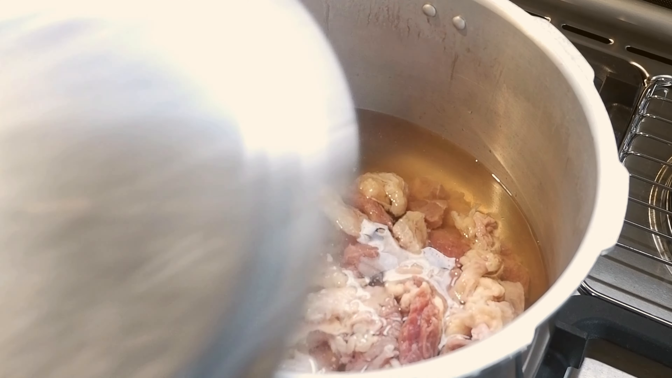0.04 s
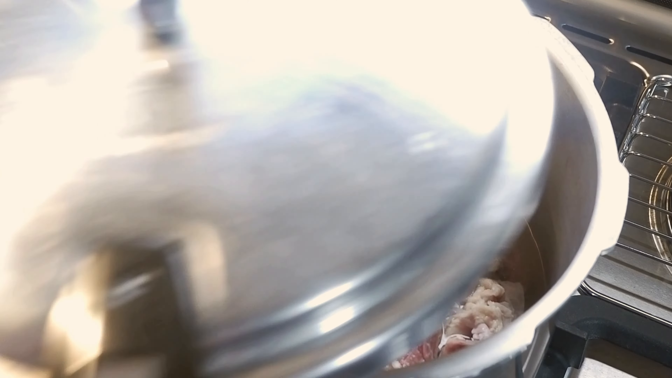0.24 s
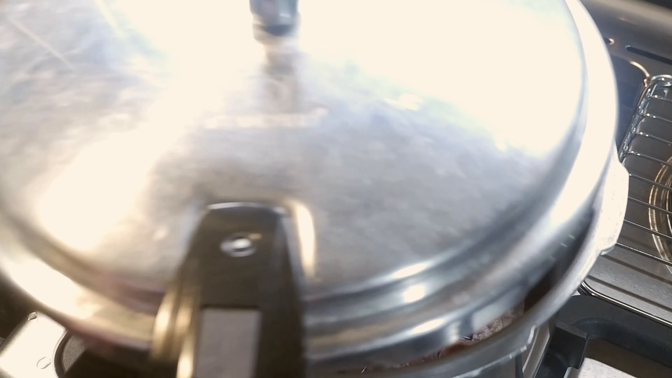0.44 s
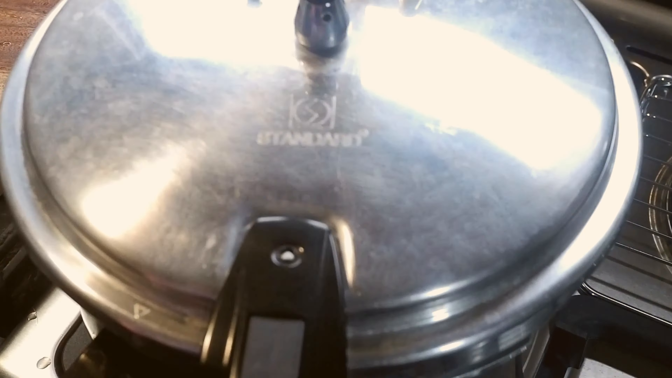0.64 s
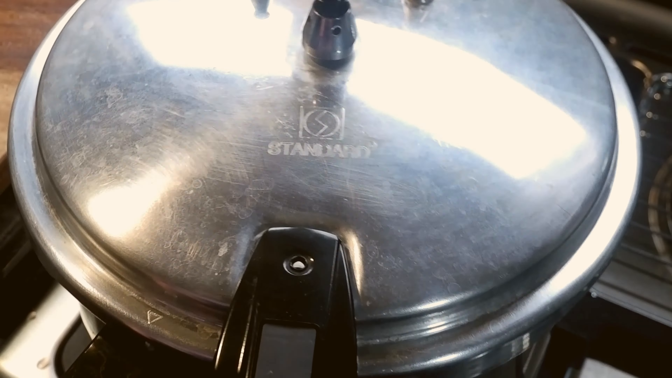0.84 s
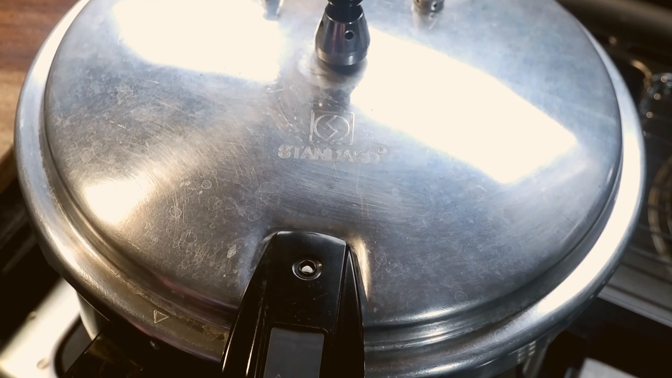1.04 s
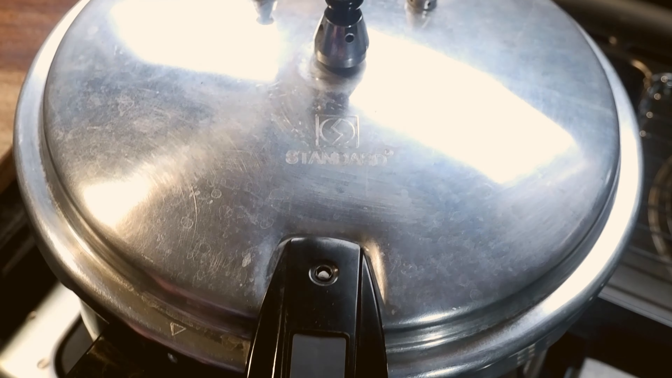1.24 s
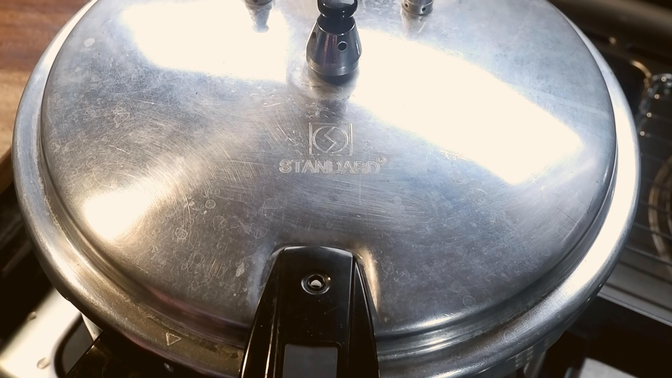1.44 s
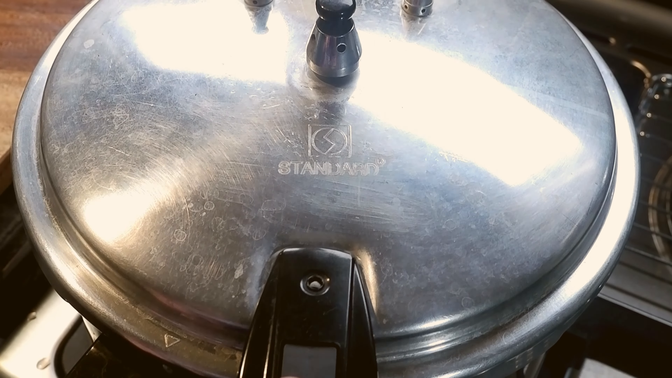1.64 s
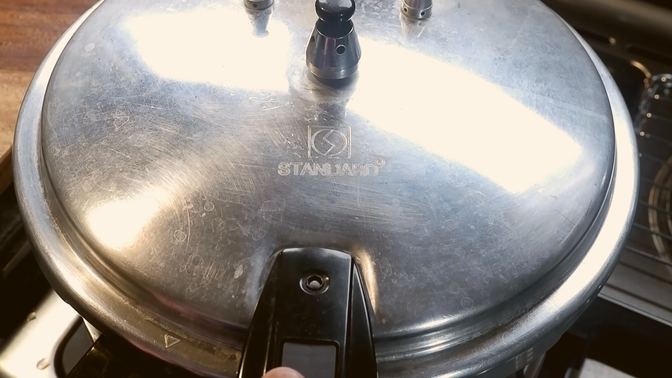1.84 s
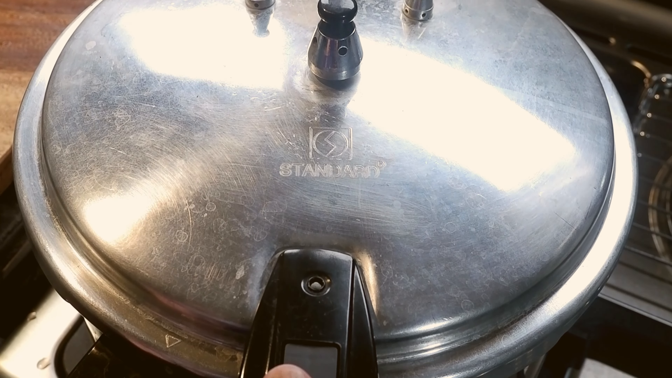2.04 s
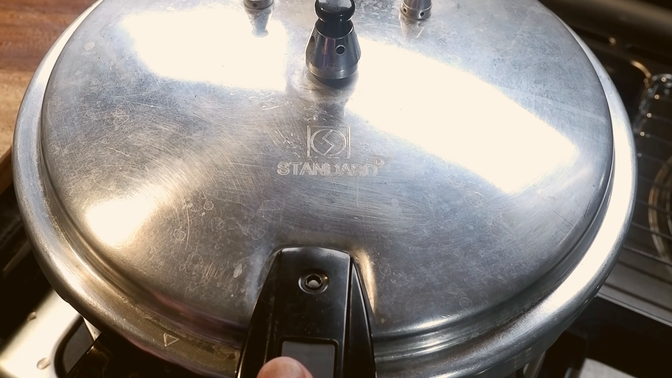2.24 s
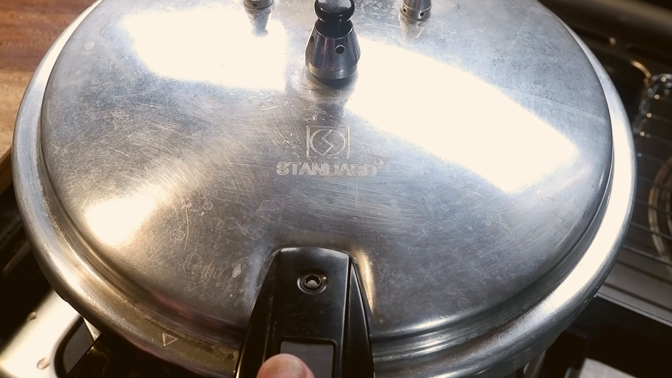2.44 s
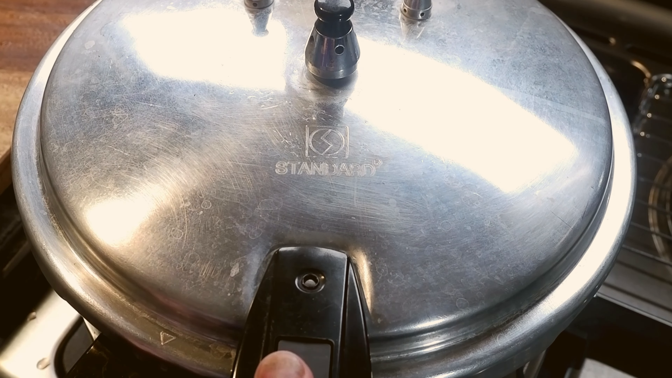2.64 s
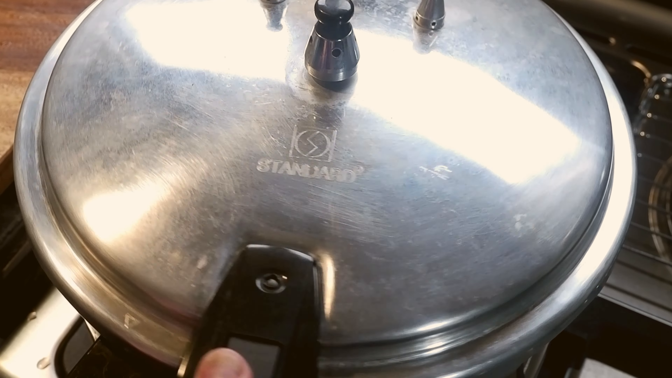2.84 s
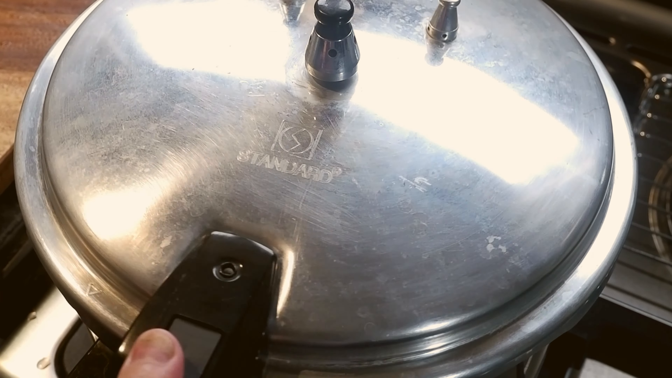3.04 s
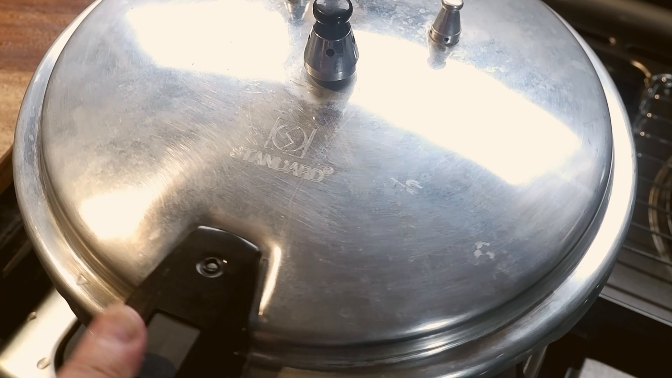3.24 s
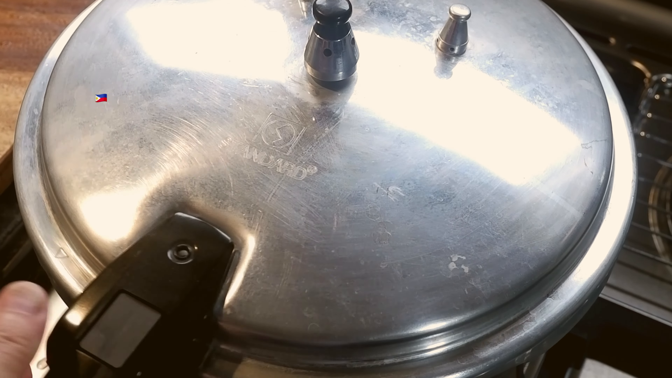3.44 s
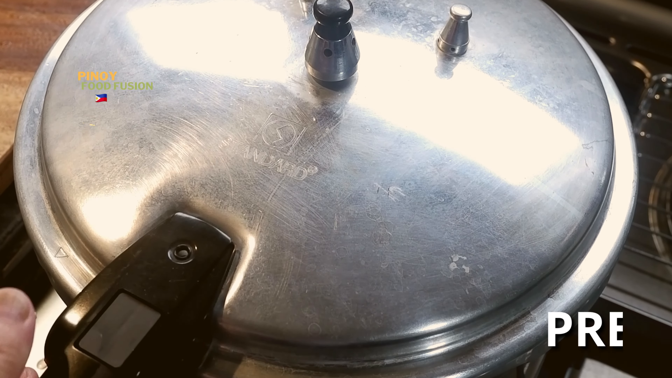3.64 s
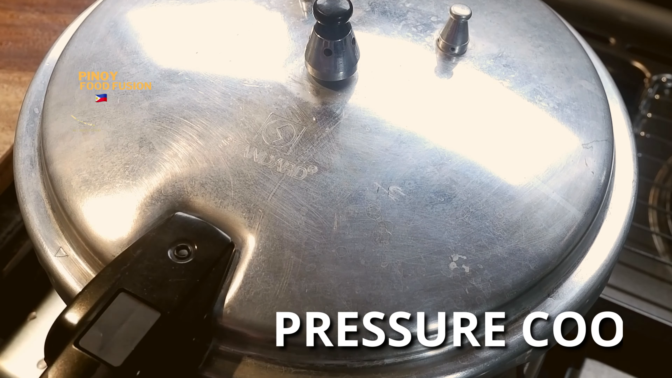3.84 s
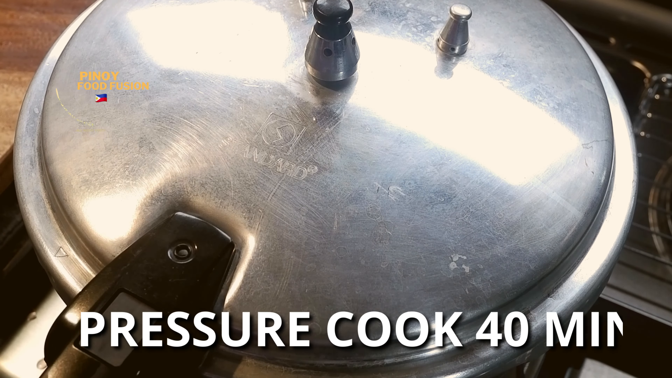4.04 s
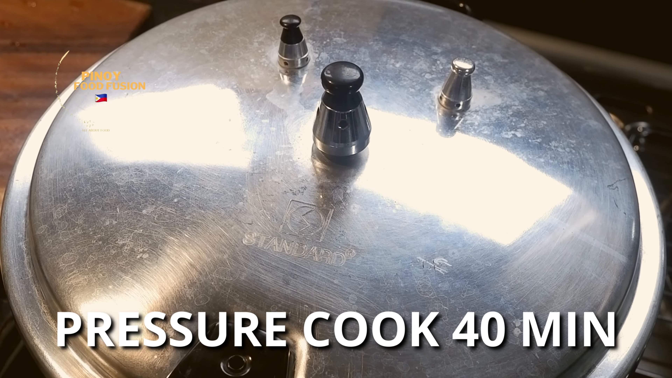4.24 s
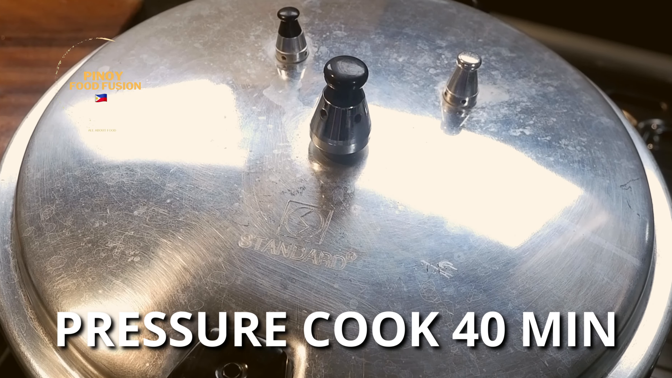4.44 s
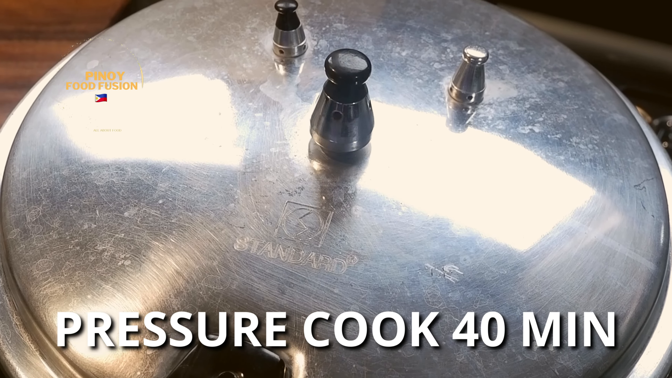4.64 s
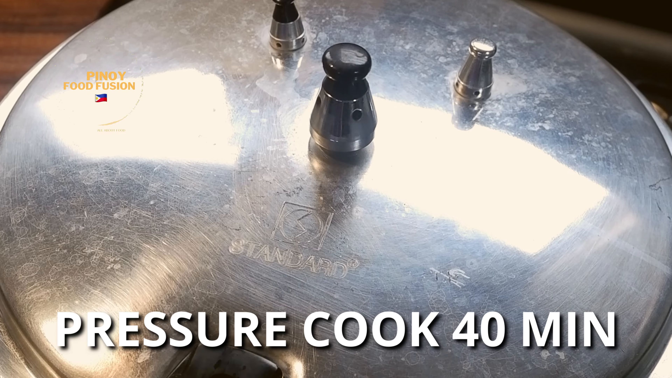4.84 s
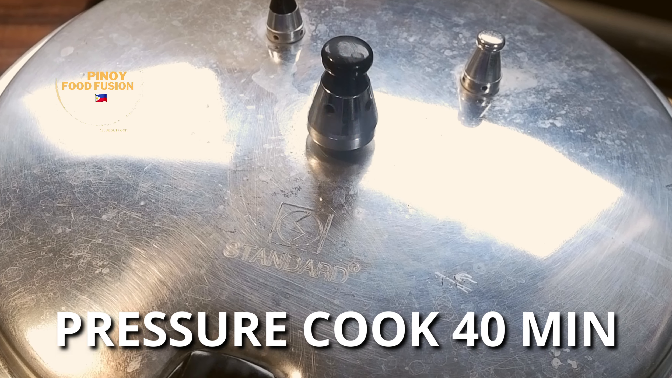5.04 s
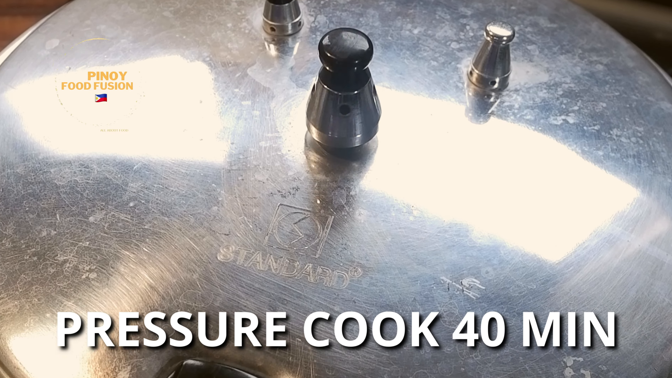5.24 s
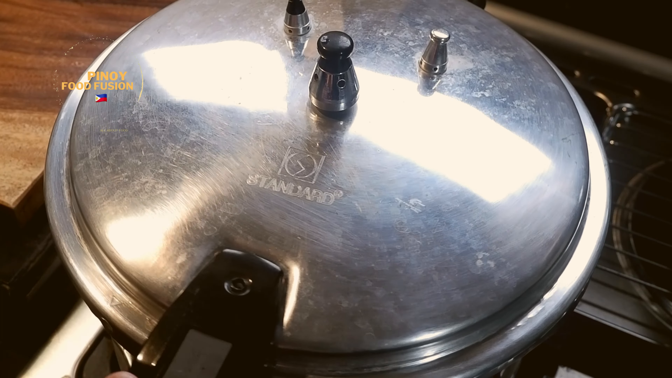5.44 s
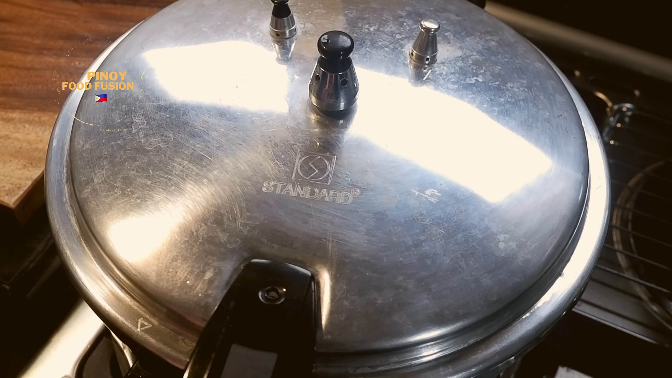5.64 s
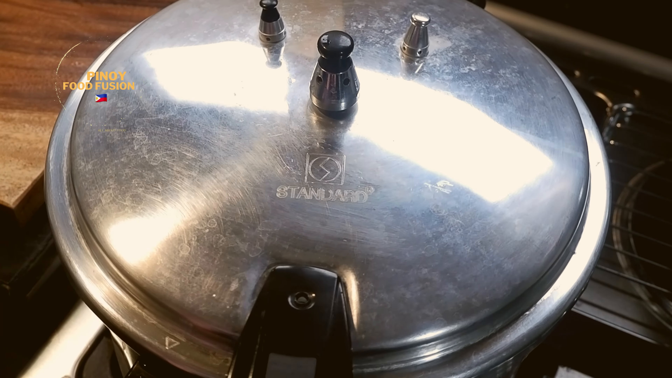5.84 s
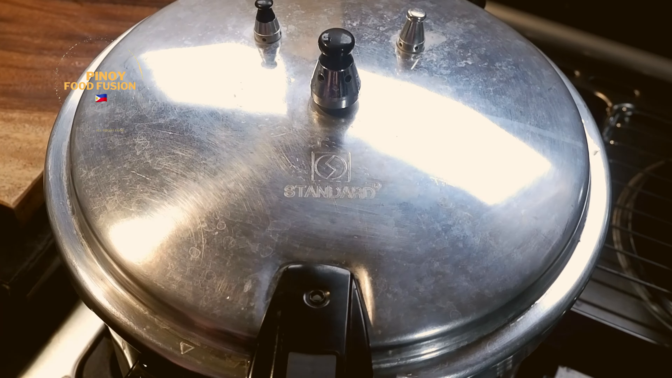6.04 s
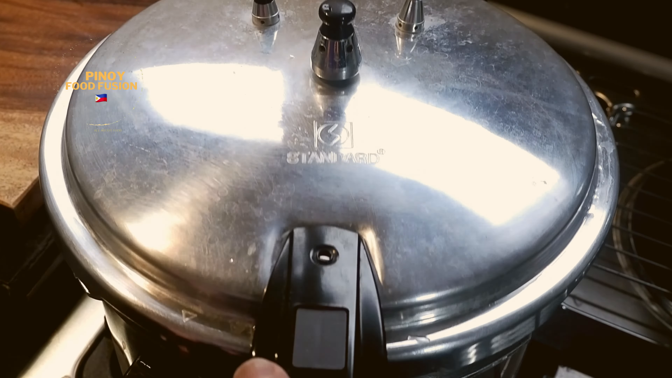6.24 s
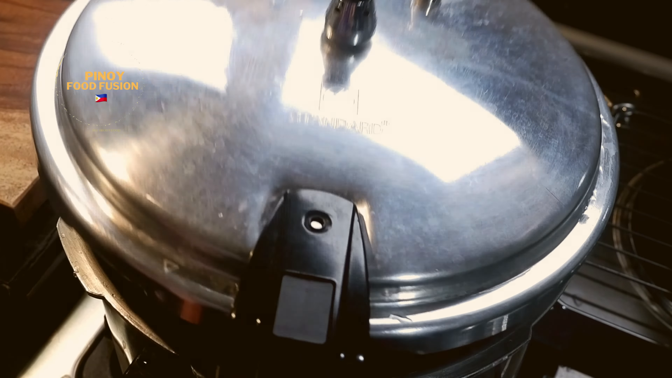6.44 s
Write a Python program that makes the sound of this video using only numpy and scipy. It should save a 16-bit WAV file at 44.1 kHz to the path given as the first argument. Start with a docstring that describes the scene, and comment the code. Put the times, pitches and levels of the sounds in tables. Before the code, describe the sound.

Close stereo pickup of a pressure cooker being shut, with a short room tail. A light clink, then a cluster of solid metallic clanks and round booms, lighter taps and grainy rubbing over a soft handling rush and faint motor-like hum. The lock pin grates and clicks home, leaving near quiet. A bright breathy steam jet cuts in, gurgles and cuts off; then small bumps, a quick squeal and a sharp snap.

```python
"""A steel lid knocks on the rim of a pressure cooker in a small kitchen, bumps, rubs and is twisted shut.
A soft rush of handling (noise) swells; a low hum (harmonics) climbs; the lock scrapes (ringing clicks)
and snaps home; rush and hum sink. Steam (coloured noise) then hisses, sputters and gurgles for a second.
The rush returns, the lock scrapes, squeals and snaps again, and the rush sinks once more.
Knocks sum filtered cracks, grating noise and decaying shell modes; a short room tail follows them."""
import sys
import numpy as np
from scipy import signal
from scipy.fft import rfft, irfft, next_fast_len
from scipy.io import wavfile
from scipy.ndimage import uniform_filter1d

SR = 44100
rng = np.random.default_rng(int(sys.argv[2]) if len(sys.argv) > 2 else 0)


def dump_mix(stems):
    """Bounce the given channels to the path in sys.argv[1] as a 16-bit WAV at rate SR."""
    frames = np.atleast_2d(stems).T  # one column per channel
    limited = np.clip(frames, -1, 1)  # hard clip at full scale
    pcm = np.round(limited * 32767).astype(np.int16)
    wavfile.write(sys.argv[1], SR, pcm)


N = 286694
T = np.arange(N) / SR


def undb(db):
    """Decibels to gain."""
    return 10 ** (np.asarray(db) / 20)


def unit(x):
    """Scale to rms 1."""
    return x / np.sqrt(np.mean(x ** 2))


def fade(t, t60):
    """Exponential decay, 60 dB in t60 seconds."""
    return np.exp(-np.log(1000) * t / t60)


def swell(s, width_s):
    """A smooth bump of height one around a time."""
    return np.exp(-((T - s) / width_s) ** 2)


def gate(start, end, rise, fall):
    """One between two times, with sloping edges; half height at the end time."""
    opening = np.clip((T - start) / rise, 0, 1)
    closing = np.clip((end - T) / fall + .5, 0, 1)
    return opening * closing


def walk(rate):
    """Smooth random wander of spread near 1, from `rate` random values a second."""
    hold = int(SR / rate)
    steps = np.repeat(rng.standard_normal(N // hold + 1), hold)
    return 1.3 * uniform_filter1d(uniform_filter1d(steps, hold), hold)[:N]


def band(x, lo_hz, hi_hz):
    """Causal band-pass."""
    return signal.sosfilt(signal.butter(3, [lo_hz, hi_hz], "band", fs=SR, output="sos"), x)


def colour(x, points):
    """Filter by a smooth (Hz, dB) spectrum."""
    hz, db = np.transpose(points)
    size = next_fast_len(N)
    f = np.maximum(np.fft.rfftfreq(size, 1 / SR), 1)
    gain = undb(np.interp(np.log(f), np.log(hz), db))
    return irfft(rfft(x, size) * gain, size)[..., :N]


def resonate(x, peaks):
    """Parallel resonances (Hz, width Hz, dB)."""
    return sum(undb(db) * signal.lfilter(*signal.iirpeak(hz, hz / width, fs=SR), x) for hz, width, db in peaks)


# Stereo width. Each row: frequency in Hz, side minus mid in dB.
WIDTH = [(60, -16), (200, -15), (400, -13), (700, -7.5), (1300, -7), (2400, -2), (4400, -0.5), (9000, -0.5),
         (15000, -0.5)]


def spread(mid, side):
    """Two ears: alike in the bass, unrelated in the treble."""
    return mid + np.array([[1], [-1]]) * colour(side, WIDTH)


def wide_noise():
    """White noise spread over two ears."""
    return spread(*rng.standard_normal((2, N)))


def grit(rate, scatter_db):
    """Two streams of dense clicks of uneven size, `rate` a second."""
    clicks = (rng.random((2, N)) < rate / SR) * rng.standard_normal((2, N))
    return unit(clicks * undb(scatter_db * rng.standard_normal((2, N))))


def place(hits):
    """Lay (s, sound) pairs along the time line."""
    out = np.zeros(N + SR)
    for s, hit in hits:
        i = int(s * SR)
        out[i:i + len(hit)] += hit
    return out[:N]


def free_rings(modes):
    """The free ringing of each mode, one row a mode."""
    t = np.arange(SR // 3) / SR
    hz, db, t60 = np.transpose(modes)[:, :, None]
    return undb(db) * np.sin(2 * np.pi * hz * t) * fade(t, t60)


def strikes(rows, modes):
    """Clean blows (s, strength dB) ring one set of modes; neighbouring modes start in opposite directions."""
    ring = (-1) ** np.arange(len(modes)) @ free_rings(modes)
    return place((s, undb(db) * ring) for s, db, *_ in rows)


def kitchen(x, early_db=-10, early_t60=0.054, late_db=-14.0, late_t60=0.26,
            treble_t60=0.22, treble_hz=2500, build_s=0.027, side_db=6):
    """Quick reflections from hob and wall, then the short tail of a small room, whose treble dies first."""
    t = np.arange(SR // 2) / SR
    early, late = rng.standard_normal((2, 2, len(t)))
    early = unit(early * fade(t, early_t60) * (t > .001))
    low = signal.sosfiltfilt(signal.butter(2, treble_hz, fs=SR, output="sos"), late)
    tail = low * fade(t, late_t60) + (late - low) * fade(t, treble_t60)
    late = unit(tail * np.minimum(t / build_s, 1))
    # the quick reflections come mostly from the sides
    early_gain = undb(early_db + np.array([[0], [side_db]]))
    response = (early_gain * early + undb(late_db) * late) / np.sqrt(len(t))
    return x + spread(*signal.fftconvolve(x[None], response, axes=1)[:, :N])


HUSH_DB, HUSH_FALL_S, HUSH_RECOVER_S = -28, 0.069, 0.57


def hush():
    """Gain of rush and hum: it sinks quickly after each snap and creeps back."""
    since = np.maximum(T - np.array(SNAPS)[:, :1], 0)
    dips = (1 - np.exp(-since / HUSH_FALL_S)) * np.exp(-since / HUSH_RECOVER_S)
    return undb(HUSH_DB * np.sum(dips, axis=0))


HUM_START_S, HUM_END_S = 1.48, 4.255
HUM_START_HZ, HUM_CLIMB_HZ_PER_S = 58.58, 4.85
# Loudness of the hum. Each row: time in seconds, level in dB.
HUM_LEVEL = [(1.5, -41.5), (2.5, -43), (2.66, -37), (3.03, -37), (3.22, -47), (3.6, -41), (4.25, -43)]
# Harmonics of the hum. Each row: multiple of the fundamental, level in dB.
HUM_ORDERS = [(1, -8), (2, 1.5), (3, -5), (4, -9), (5, -16.5), (6, -13), (7, -39)]


def hum(jitter=0.0074, flutter_db=3.0):
    """Fluttering harmonics climb steadily in pitch, like a distant motor gathering speed."""
    hz = HUM_START_HZ + HUM_CLIMB_HZ_PER_S * (T - HUM_START_S)
    phase = 2 * np.pi * np.cumsum(hz * (1 + jitter * walk(39.84))) / SR
    tone = 0
    for order, db in HUM_ORDERS:
        gain = undb(db + flutter_db * walk(12))
        tone = tone + gain * np.sin(order * phase + rng.uniform(0, 2 * np.pi))
    level = undb(np.interp(T, *np.transpose(HUM_LEVEL)))
    return np.sqrt(2) * tone * level * gate(HUM_START_S, HUM_END_S, 0.026, 0.017)


RUMBLE_DB, RUB_DB = -41, -47.5  # before the press
PRESS_S, PRESS_WIDTH_S = 2.1, 0.81
PRESS_RUMBLE_DB, PRESS_RUB_DB = 3.5, 1.5
# Spectrum of the rush of handling. Each row: frequency in Hz, density in dB per Hz.
RUSH = [(25, -23), (60, -4), (95, -4.5), (135, -2), (230, -1.5), (360, -5), (720, -13.5), (1150, -15),
        (2780, -29), (4400, -38), (11800, -48.5), (15000, -52)]


def handling(split_hz=750):
    """A low rush with a fine rub above it, stronger as the lid is pressed; silent while the steam blows."""
    press = swell(PRESS_S, PRESS_WIDTH_S)
    rumble = unit(band(colour(wide_noise(), RUSH), 29.6, split_hz))
    rub = unit(band(colour(wide_noise(), RUSH), split_hz, 13400))
    rumble *= undb(RUMBLE_DB + PRESS_RUMBLE_DB * press + 2.04 * walk(24.91))
    rub *= undb(RUB_DB + PRESS_RUB_DB * press + 0.61 * walk(20))
    return (rumble + rub) * (1 - gate(STEAM_START_S, STEAM_END_S, 0.0042, .004))


STEAM_START_S, STEAM_END_S = 4.248, 5.448
STEAM_DB, SPUTTER_S = -41, 0.055  # steady jet; half length of a sputter
# Spectrum of the jet. Each row: frequency in Hz, density in dB per Hz.
JET = [(25, -17), (60, -11.5), (200, -10), (450, -13.5), (700, -13.5), (1000, -11.5), (2300, -8),
       (4800, -9), (6500, -7.5), (10500, -8), (13000, -13), (15600, -19.5)]
# Whistles of the vent. Each row: frequency in Hz, width in Hz, level in dB.
VENT = [(860, 15, 4), (1280, 45, 0), (6200, 21, 13), (6400, 93, -7), (10000, 60, -8)]
# Sputters and surges of the jet. Each row: time in seconds, change of level in dB.
SPUTTERS = [(4.365, -5), (4.87, 1.5), (4.945, -5), (5.02, 3.5), (5.065, -6), (5.285, -6)]


def steam(whistle_db=-16):
    """A broad jet of noise that sputters now and then, with faint resonant whistles of the vent."""
    jet = unit(colour(wide_noise(), JET))
    whistle = unit(resonate(wide_noise(), VENT))
    flow_db = STEAM_DB + sum(db * swell(s, SPUTTER_S) for s, db in SPUTTERS) + 0.33 * walk(40)
    on = gate(STEAM_START_S, STEAM_END_S, 0.0046, 0.011)
    return (jet + undb(whistle_db) * whistle) * undb(flow_db) * on


SPIT_RISE_S, SPIT_T60_S, SPIT_LO_HZ, SPIT_HI_HZ = 0.004, 0.11, 800, 1330
GURGLE_WIDTH_HZ = 27
# Spits of condensate. Each row: time in seconds, level in dB.
SPITS = [(4.818, -47), (4.985, -45), (5.102, -49), (5.342, -50), (5.402, -42.5)]
# Gurgles of the wet vent. Each row: start in seconds, end in seconds, level in dB, pitch in Hz.
GURGLES = [(4.952, 5.07, -64, 860), (5.108, 5.175, -57, 853), (5.285, 5.443, -61, 1280),
           (5.344, 5.36, -56, 1285), (5.363, 5.39, -53, 2200)]


def burbles():
    """Condensate spits in the vent and sets it gurgling: noise bursts, then noise through narrow resonances."""
    flow = rng.standard_normal(N)
    envelope = 0
    for s, db in SPITS:
        t = np.maximum(T - s, 0)
        envelope = envelope + undb(db) * (1 - np.exp(-t / SPIT_RISE_S)) * fade(t, SPIT_T60_S)
    out = envelope * unit(band(flow, SPIT_LO_HZ, SPIT_HI_HZ))
    for start, end, db, hz in GURGLES:
        note = unit(resonate(flow, [(hz, GURGLE_WIDTH_HZ, 0)]))
        out = out + undb(db) * note * gate(start, end, 0.008, 0.03)
    return out


# Lid rubbing along the rim. Each row: time in seconds, half length in seconds, level in dB.
RUBS = [(1.922, 0.036, -48), (2.083, 0.046, -48), (2.242, 0.025, -50.5), (2.412, 0.03, -49),
        (2.706, 0.014, -52), (5.745, 0.052, -49)]
# Spectrum of the rubs. Each row: frequency in Hz, density in dB per Hz.
RUB_COLOUR = [(500, -23), (1500, 3), (3200, 3.5), (5000, -8), (10000, -16), (15000, -28)]


def rubs():
    """Short, grainy rubs of steel on steel: coloured dense clicks."""
    grain = unit(colour(spread(*grit(4000, 2.4)), RUB_COLOUR))
    return grain * sum(undb(db) * swell(s, width_s) for s, width_s, db in RUBS)


SLIPS_PER_S, SLIP_SCATTER_DB, SLIDE_WAVER_DB = 14000, 1.5, 0.8
# Slides of the lock pin. Each row: start in seconds, end in seconds, rise in seconds, squeak in dB,
# groan in dB, judder in dB, pitch factor of the squeak, width factor of the squeak.
SLIDES = [(2.973, 3.631, 0.017, -51, -54.5, -43.5, 0.99, 1.24),
          (6.11, 6.203, 0.036, -44.5, -38, -53, 1.03, 1.3),
          (6.204, 6.268, 0.0021, -47, -36, -38.5, 1.044, 1)]
# Resonances excited by the slides. Each row: frequency in Hz, width in Hz, level in dB.
SQUEAK = [(2650, 460, -4), (3240, 290, 5.5), (3494, 210, 6.5), (4580, 390, 0), (6060, 250, -12),
          (6920, 490, -18), (8500, 180, -3), (8900, 700, -18)]
# Same columns: frequency in Hz, width in Hz, level in dB.
GROAN = [(790, 96, -3), (995, 150, 4.5), (1160, 110, 4)]
# Same columns: frequency in Hz, width in Hz, level in dB.
JUDDER = [(203, 56, 1), (276, 16, 9), (360, 320, -6.5)]


def lock():
    """The sliding lock catches and slips in dense clicks that ring pin, handle and lid."""
    clicks = spread(*grit(SLIPS_PER_S, SLIP_SCATTER_DB))
    out = np.zeros((2, N))
    for start, end, rise, squeak_db, groan_db, judder_db, pitch, blur in SLIDES:
        push = gate(start, end, rise, 0.0048)
        on = push > 0
        squeak = [(hz * pitch, width * blur, db) for hz, width, db in SQUEAK]
        for db, peaks in ((squeak_db, squeak), (groan_db, GROAN), (judder_db, JUDDER)):
            # a second, wider pass steepens the skirts
            skirts = [(hz, 2 * width, 0) for hz, width, _ in peaks]
            voice = resonate(resonate(clicks[:, on], peaks), skirts)
            out[:, on] += undb(db) * push[on] * unit(voice)
    return out * undb(SLIDE_WAVER_DB * walk(60))


SQUEAL_START_S, SQUEAL_END_S = 6.166, 6.197
SQUEAL_START_HZ, SQUEAL_CLIMB_HZ_PER_S, SQUEAL_DB = 980, 3900, -33


def squeal(jitter=0.014, flutter_db=2.5):
    """Stick and slip fall into step: a rough note that climbs as the pin speeds up."""
    elapsed_s = np.clip(T, SQUEAL_START_S, SQUEAL_END_S) - SQUEAL_START_S
    hz = SQUEAL_START_HZ + SQUEAL_CLIMB_HZ_PER_S * elapsed_s
    phase = 2 * np.pi * np.cumsum(hz * (1 + jitter * walk(300))) / SR
    level = undb(SQUEAL_DB + flutter_db * walk(150))
    return np.sqrt(2) * np.sin(phase) * level * gate(SQUEAL_START_S, SQUEAL_END_S, 0.0026, 0.017)


TILT_PIVOT_HZ = 1440
SPOT_LIFT_DB, SPOT_OCTAVES = 5.5, 0.49  # parts near the note of the struck spot stand out
# Parts of a knock: thump, clunk, clang, clink, tick.
# Each row: low edge in Hz, high edge in Hz, gain in dB, ring length factor.
PARTS = [(122, 506, -0.1, 1.76), (500, 1020, -3, 1.26), (1052, 1904, -3, 1.56), (2290, 4420, -10, 1.5),
         (5550, 10800, -23.5, 1.97)]


def part_levels(db, tilt, thump_db, spot_hz):
    """Level of each part of a knock, from strength, brightness, the pot's thump and the struck spot."""
    hz = np.array([np.sqrt(lo * hi) for lo, hi, *_ in PARTS])
    lift = SPOT_LIFT_DB * np.exp(-(np.log2(hz / spot_hz) / SPOT_OCTAVES) ** 2)
    return db + tilt * np.log2(hz / TILT_PIVOT_HZ) + thump_db * (hz == hz.min()) + lift


MODE_SCATTER_DB = 3.5  # either way
MODE_DETUNE = 0.0037  # the grip on the lid shifts its modes a little from knock to knock


def knock(rings, levels_db, ring_db, contact_s, spot_hz, dense_t60, modes_db=-38.0, dense_db=-22,
          grate_db=-14, square_s=0.003, spot_db=-24, spot_t60=0.046, spot_damping=0.37):
    """A crack, grating edges, the struck spot's note, a dying crowd of shell modes and the lid's clear modes."""
    t = np.arange(rings.shape[1]) / SR
    # each place on the rim favours other modes
    weight = undb(MODE_SCATTER_DB * rng.uniform(-1, 1, len(rings))) * rng.choice([-1, 1], len(rings))
    detuned_t = t * (1 + MODE_DETUNE * rng.standard_normal())
    ring = undb(modes_db + ring_db) * np.interp(detuned_t, t, weight @ rings)
    spot = undb(spot_db + spot_damping * ring_db) * np.sin(2 * np.pi * spot_hz * t) * fade(t, spot_t60)
    # a square blow cracks at once; a long, glancing one swells and grates instead
    crack = (t == 0) * np.exp(-(contact_s / square_s) ** 2)
    rise = 1 - np.exp(-4 * t / contact_s)
    grating = undb(grate_db) * rng.standard_normal(len(t)) * np.exp(-(t / contact_s) ** 2)
    crowd = undb(dense_db) * rng.standard_normal(len(t))
    out = 0
    for (lo_hz, hi_hz, gain_db, length), db in zip(PARTS, levels_db):
        body = grating + spot + crowd * fade(t, dense_t60 * length) + ring
        part = band(crack + rise * body, lo_hz, hi_hz)
        onset_rms = np.sqrt(np.mean(part[:SR // 80] ** 2))
        out = out + undb(db + gain_db) * part / onset_rms
    return out


# Modes of lid and pot. Each row: frequency in Hz, level in dB, t60 in seconds.
LID_MODES = [(185.3, -3.5, 0.22), (222.8, -1, 0.25), (291.3, -3, 0.35), (346.3, -5, 0.23), (430, -8, 0.14),
             (690, -9, 0.16), (794, -2.5, 0.3), (932, -3, 0.18), (1019, -10, 0.15), (1108, -1.5, 0.13),
             (1187, -3.5, 0.12), (1328, -1, 0.14), (1528, -6, 0.12), (1640, -6, 0.25), (1735, -4, 0.21),
             (1768, -0.5, 0.25), (2050, -5, 0.26), (2280, -4, 0.176), (2611, -4, 0.17), (2686, -2.5, 0.22),
             (2918, -5, 0.15), (3230, -0.5, 0.18), (3470, -3, 0.17), (3844, -7.5, 0.13), (4662, -6, .11),
             (5750, 2, 0.15)]


def knocks(contacts, dense_t60, soft_hz=11500):
    """Contacts of lid, rim and lock; the give of the metal rounds the very top."""
    rings = free_rings(LID_MODES)
    hits = []
    for s, db, tilt, thump_db, ring_db, contact_s, spot_hz in contacts:
        levels_db = part_levels(db, tilt, thump_db, spot_hz)
        hits.append((s, knock(rings, levels_db, ring_db, contact_s, spot_hz, dense_t60)))
    return signal.sosfilt(signal.butter(2, soft_hz, fs=SR, output="sos"), place(hits))


SNAP_TILT_DB_PER_OCTAVE, SNAP_CONTACT_S = 7.1, 20 / SR  # bright and square
SNAP_RING_DB, SNAP_THUMP_DB = -28, -23  # damped; the light pin hardly moves the pot
GRAZE_TILT_DB_PER_OCTAVE, GRAZE_DB, GRAZE_CONTACT_S = 3.5, -1.5, 0.005  # duller; level over the snap
# The lock snaps home. Each row: time in seconds, strength in dB, pitch of the struck spot in Hz,
# lead of the graze in seconds.
SNAPS = [(3.6523, -31, 1538, 0.004), (6.2697, -32.5, 3000, 0.006)]


def snaps():
    """Contact rows, two a snap: the pin grazes its slot, then seats squarely."""
    damped = SNAP_THUMP_DB, SNAP_RING_DB
    rows = []
    for s, db, spot_hz, lead_s in SNAPS:
        rows.append((s - lead_s, db + GRAZE_DB, GRAZE_TILT_DB_PER_OCTAVE, *damped, GRAZE_CONTACT_S, spot_hz))
        rows.append((s, db, SNAP_TILT_DB_PER_OCTAVE, *damped, SNAP_CONTACT_S, spot_hz))
    return rows


SNAP_CROWD_T60_S = 0.02  # before each part's length factor; the seated pin damps the shell at once
PIN_DB = 7  # ring of the pin over the strength of its snap
# Modes of the lock pin. Each row: frequency in Hz, level in dB, t60 in seconds.
PIN_MODES = [(1130, -3, 0.015), (1500, -1, 0.01), (2660, -8, 0.019), (3920, -8, 0.016)]


def pin():
    """The pin grazes, snaps and rings briefly in its own modes, and squeals as it slides."""
    return knocks(snaps(), SNAP_CROWD_T60_S) + undb(PIN_DB) * strikes(SNAPS, PIN_MODES) + squeal()


# Light chatter of the lid riding on the rim.
# Each row: start in seconds, end in seconds, contacts a second, level in dB.
CHATTER = [(1.098, 1.16, 68.7, -42), (1.545, 1.581, 89, -42), (1.862, 1.971, 55, -49),
           (3.065, 3.078, 127, -39.5)]


def chatter(tilt=-2.0, thump_db=2, ring_db=-4, contact_s=0.018, scatter_db=-0.2):
    """Contact rows, laid out like the knocks: faint, glancing, at random times and spots."""
    rows = []
    for start, end, rate, db in CHATTER:
        for s in rng.uniform(start, end, int((end - start) * rate)):
            strength_db = db + scatter_db * rng.standard_normal()
            rows.append((s, strength_db, tilt, thump_db, ring_db, contact_s, rng.uniform(846, 2046)))
    return rows


BOOM_RISE_S, BOOM_T60_S = 0.0016, 0.084
BOOM_OVERTONE, BOOM_OVERTONE_DB = 1.41, -11  # second mode of the pot, as a multiple of the first
# The lid bumps down on its gasket. Each row: time in seconds, level in dB, pitch in Hz.
BOOMS = [(0.937, -20.5, 280), (1.077, -17, 209), (1.094, -20, 233), (1.119, -28, 273), (1.145, -17, 247),
         (1.201, -19.5, 266), (1.237, -13, 214), (1.383, -24.5, 200), (1.477, -12, 181),
         (1.512, -19.5, 238), (1.538, -22, 135), (1.848, -23.5, 250), (3.066, -21, 325),
         (2.357, -25.5, 305), (6.008, -26.5, 332), (6.04, -29, 276), (6.205, -24, 300), (6.217, -29, 383)]


def booms():
    """Each bump on the gasket gives a short, round boom of the closed pot: two decaying modes."""
    t = np.arange(SR // 4) / SR
    shape = (1 - np.exp(-t / BOOM_RISE_S)) * fade(t, BOOM_T60_S)
    hits = []
    for s, db, hz in BOOMS:
        overtone = undb(BOOM_OVERTONE_DB) * np.sin(2 * np.pi * hz * BOOM_OVERTONE * t)
        hits.append((s, undb(db) * shape * (np.sin(2 * np.pi * hz * t) + overtone)))
    return band(place(hits), 95, 900)


# The edge of the carried lid skips on the open pot. Each row: time in seconds, strength in dB.
CLINKS = [(0.366, -20), (0.3682, -27), (0.3765, -27.5)]
# Modes of the open pot's rim. Each row: frequency in Hz, level in dB, t60 in seconds.
RIM_MODES = [(1130, 3, 0.048), (1204, 4, 0.063), (1330, -11, 0.11), (1400, 0, 0.029), (1710, -7, 0.073),
             (1774, -8, 0.11), (1950, -9, 0.07), (2300, -21.5, 0.21), (3160, -23, 0.12)]
# Lid on rim, and one dull knock of the lock at 6.167 s. Each row: time in seconds, strength in dB, # brightness
# in dB per octave, extra thump of the pot in dB, free ringing in dB, contact time in seconds, # pitch of the
# struck spot in Hz.
KNOCKS = [(0.021, -44, 4, 5, -8, 0.0028, 2680), (0.3655, -37, 6, -10, -15, 0.0025, 2350),
          (0.377, -37.5, 5.5, -10, -4, 0.008, 2300), (0.9345, -20.5, 0.3, -6.5, -7, 0.0005, 1388),
          (1.034, -40, 2, 8.5, -5, 0.029, 1750), (1.0777, -20.5, -0.5, -4.5, 1, 0.0019, 827),
          (1.096, -31.5, 2.5, -4, 5, 0.016, 1730), (1.175, -36, -1, -1, 0, 0.004, 1350),
          (1.237, -26, -2.5, -4, -1, 0.0013, 1773), (1.4765, -24, 0.3, 1, -2, 0.0006, 1130),
          (1.508, -37.5, 2, -2, 9, 0.024, 1800), (1.536, -30.5, -1, -0.5, 1.5, 0.0098, 1500),
          (1.762, -46.5, 0, -5, 7, 0.0013, 1190), (1.834, -25, 1.5, -1, -5, 0.003, 1773),
          (1.877, -42.5, 0, 6, 2, 0.0074, 1500), (2.003, -38.5, 0, 6, 2, 0.003, 1690),
          (2.131, -40, -3, -19, 2, 0.0035, 1646), (2.332, -37.5, -6.5, -8.5, -7.5, 0.0027, 875),
          (3.012, -28, 3, -11, 0, 0.0044, 943), (3.04, -29, -1.5, 0.5, -19, 0.006, 665),
          (3.051, -25, -1, -1, -11, 0.0017, 725), (3.06, -28.5, 3.5, 10.5, -14, 0.011, 690),
          (5.7213, -41, 3.5, 3, 0, 0.0019, 2918), (6.003, -42, -2, -1, 2, 0.012, 895),
          (6.167, -40, -1.5, -14, -12, 0.0014, 1005)]


def lid():
    """The lid knocks and chatters on the rim, clinks on the open pot and booms on its gasket; the lock knocks
    once."""
    return knocks(KNOCKS + chatter(), dense_t60=0.058) + strikes(CLINKS, RIM_MODES) + booms()


def scene(pan_db=0.95):
    """The cooker stands just left of centre; lid, pin and burbles are heard with the room."""
    steady = (hum() + handling()) * hush()
    cooker = steady + lock() + rubs() + steam() + kitchen(lid() + pin() + burbles())
    return cooker * undb(np.array([[pan_db], [-pan_db]]) / 2)


TOP_HZ = 15700


def record(dry):
    """A steep elliptic low-pass cuts the top."""
    return signal.sosfilt(signal.ellip(10, .2, 70, TOP_HZ, fs=SR, output="sos"), dry)


dry = scene()
out = record(dry)
dump_mix(out)
```